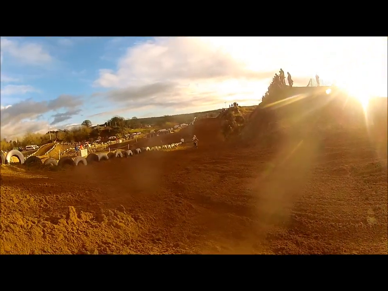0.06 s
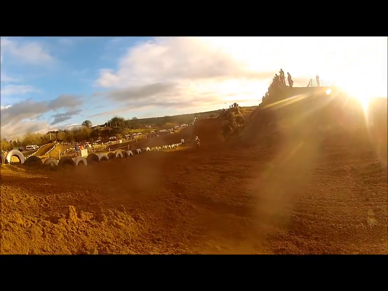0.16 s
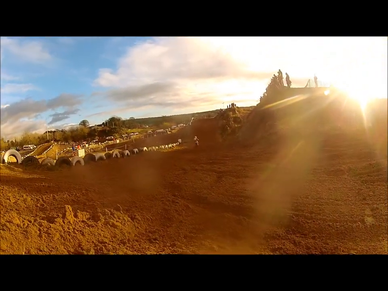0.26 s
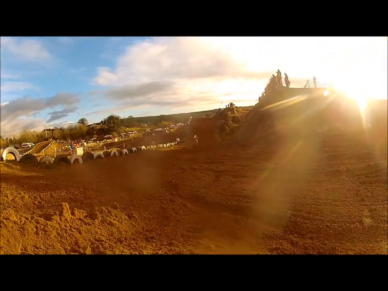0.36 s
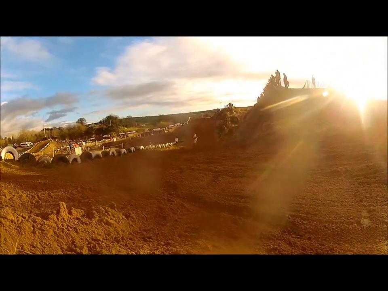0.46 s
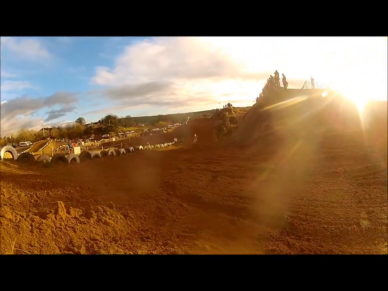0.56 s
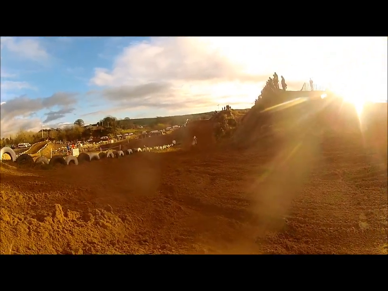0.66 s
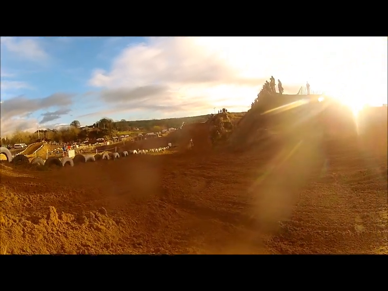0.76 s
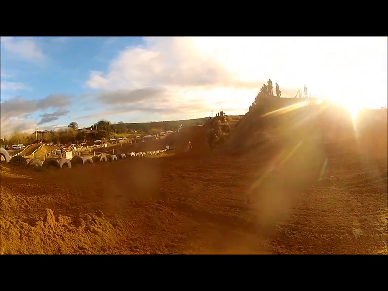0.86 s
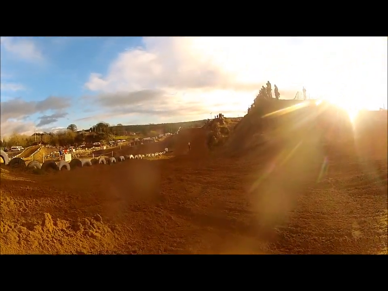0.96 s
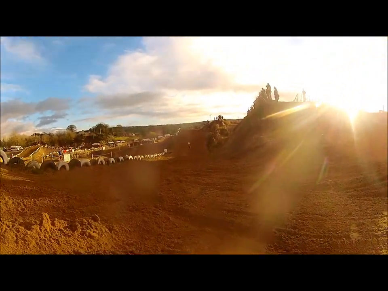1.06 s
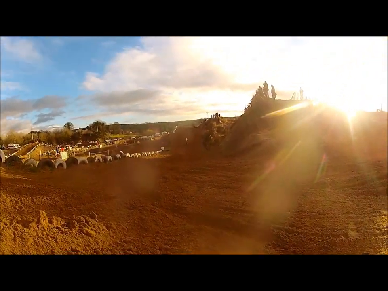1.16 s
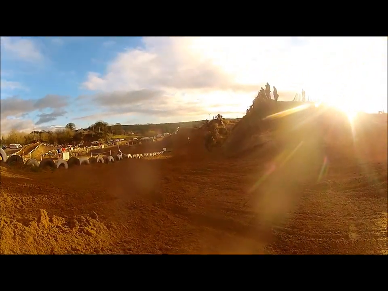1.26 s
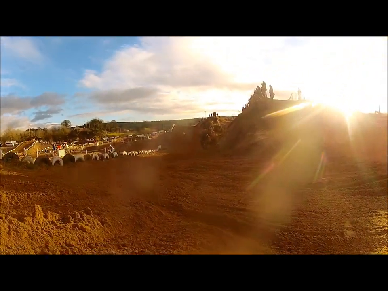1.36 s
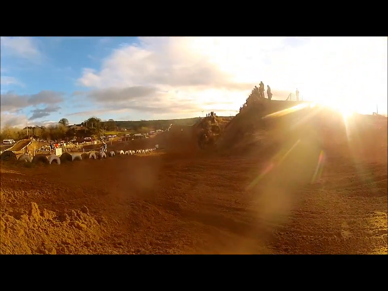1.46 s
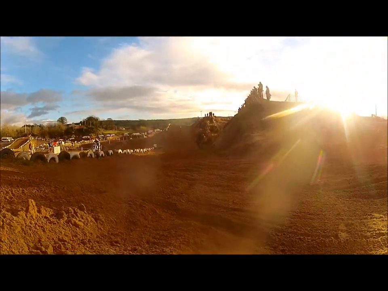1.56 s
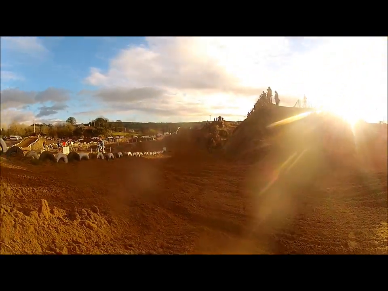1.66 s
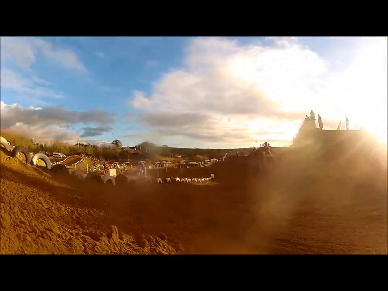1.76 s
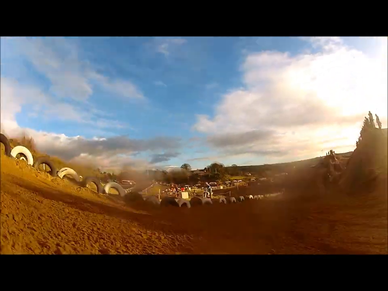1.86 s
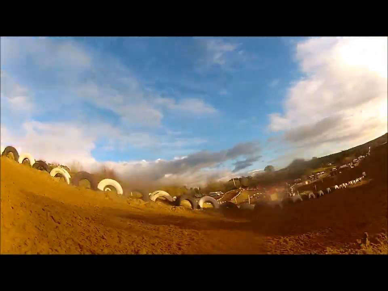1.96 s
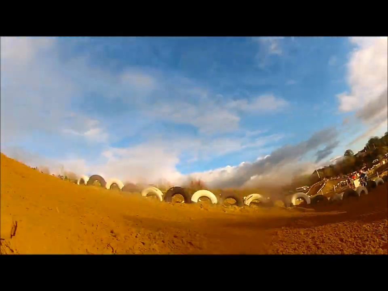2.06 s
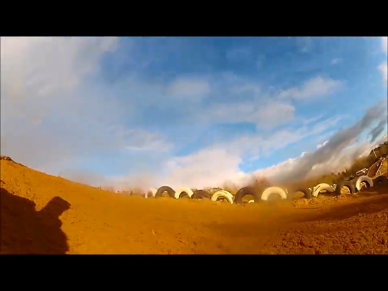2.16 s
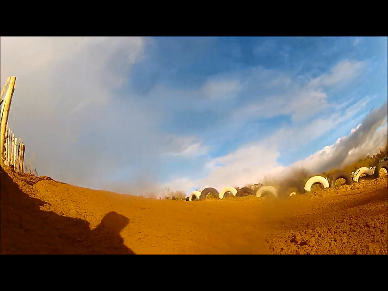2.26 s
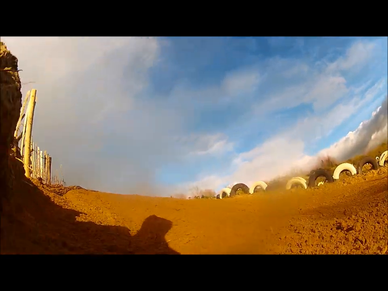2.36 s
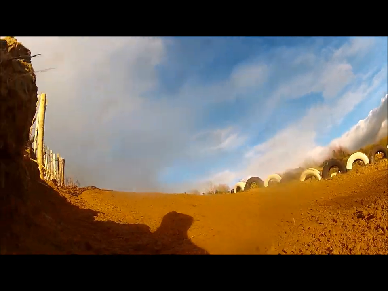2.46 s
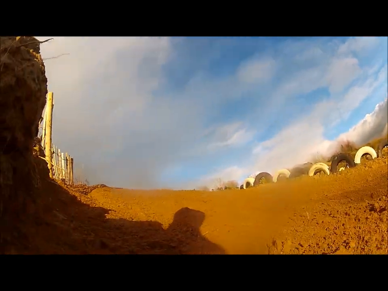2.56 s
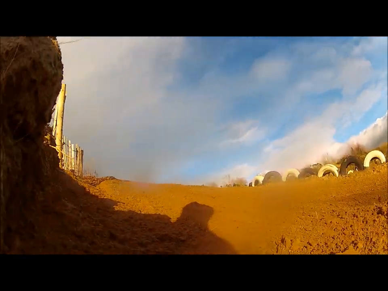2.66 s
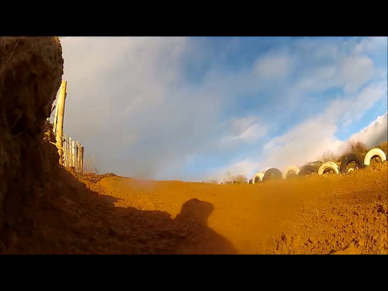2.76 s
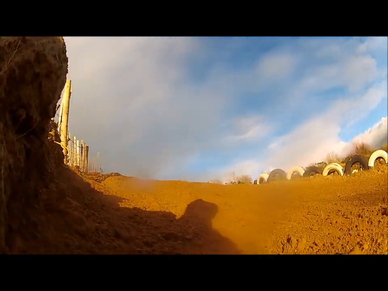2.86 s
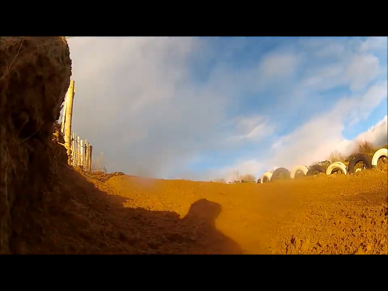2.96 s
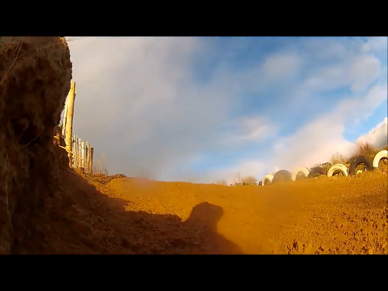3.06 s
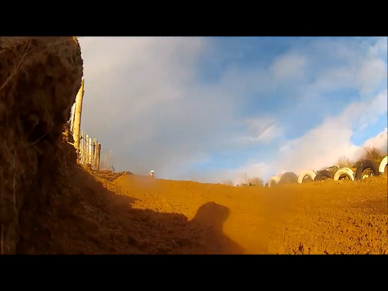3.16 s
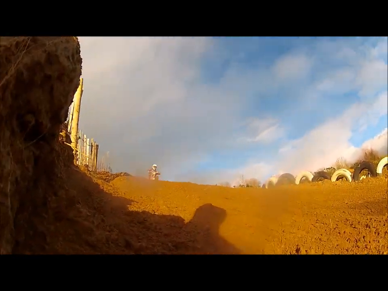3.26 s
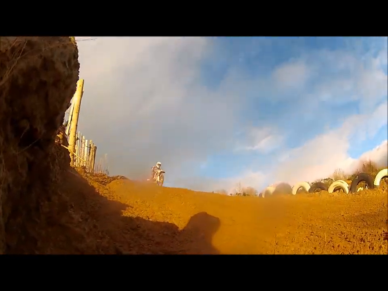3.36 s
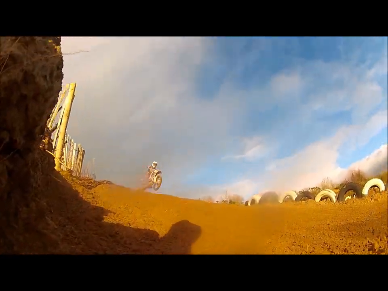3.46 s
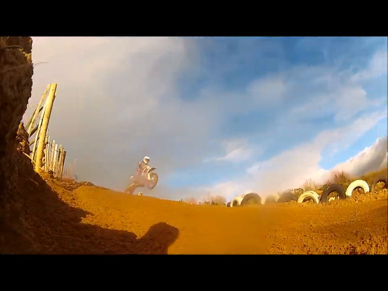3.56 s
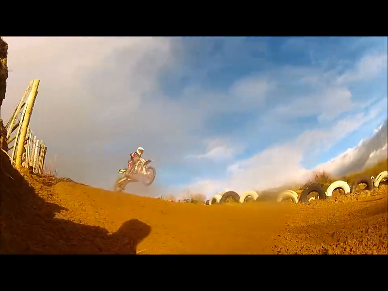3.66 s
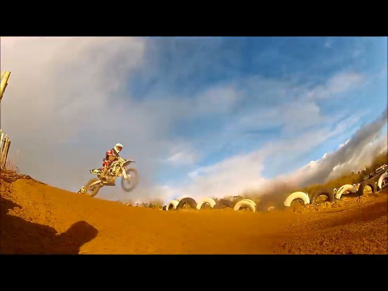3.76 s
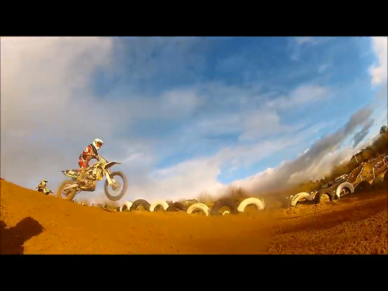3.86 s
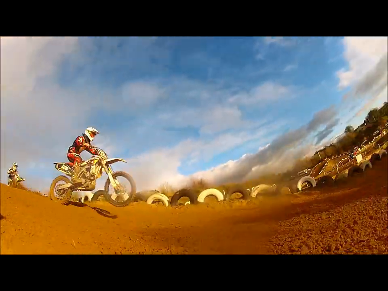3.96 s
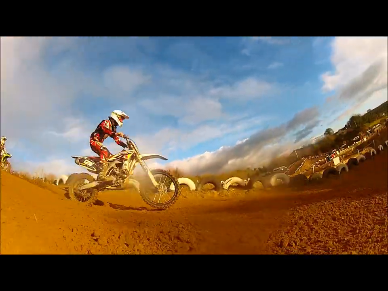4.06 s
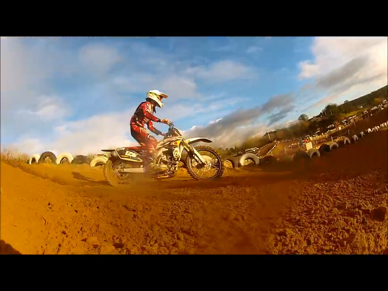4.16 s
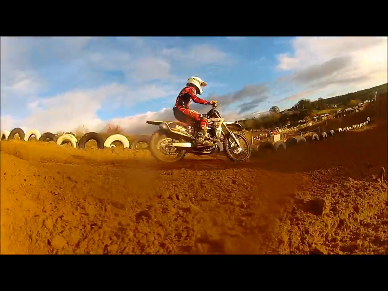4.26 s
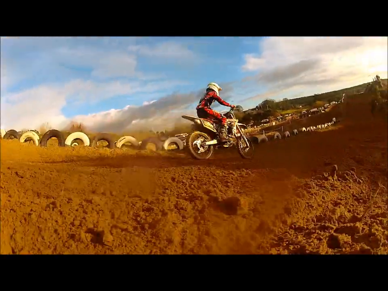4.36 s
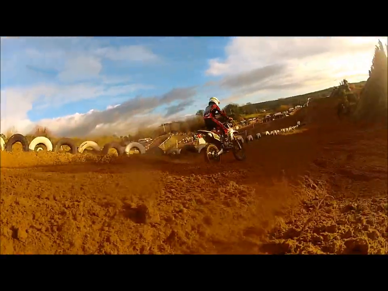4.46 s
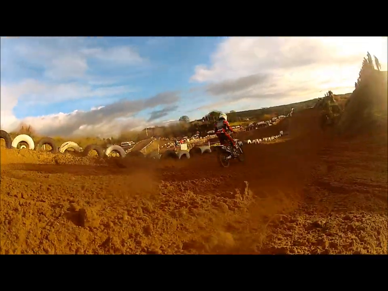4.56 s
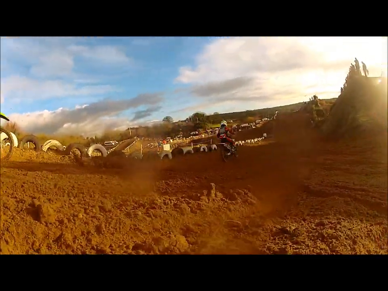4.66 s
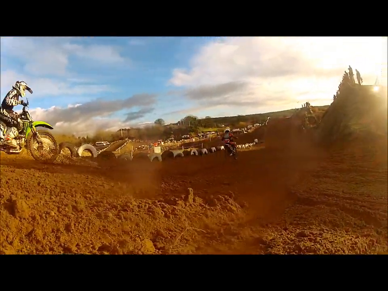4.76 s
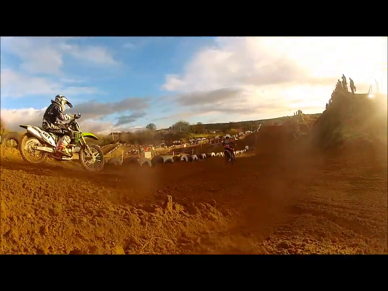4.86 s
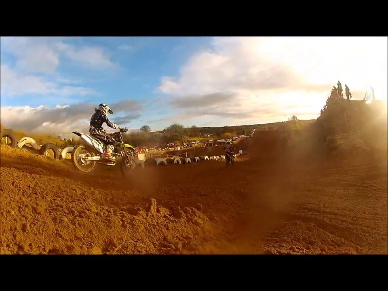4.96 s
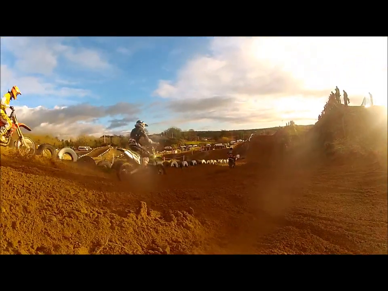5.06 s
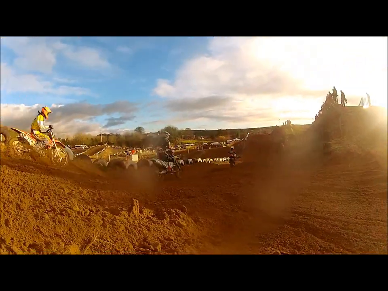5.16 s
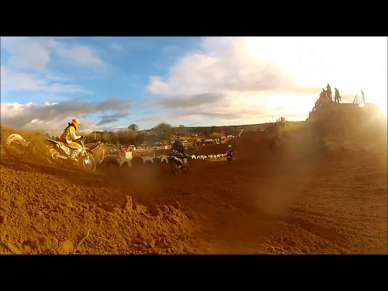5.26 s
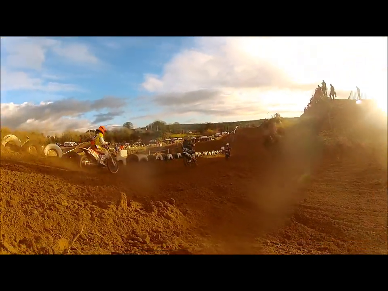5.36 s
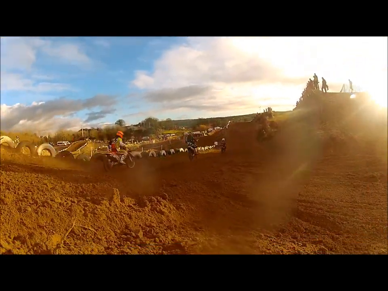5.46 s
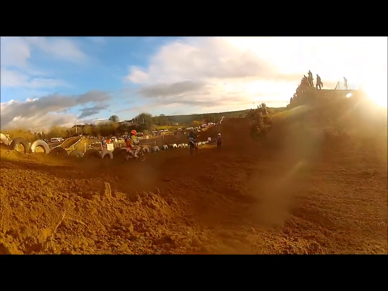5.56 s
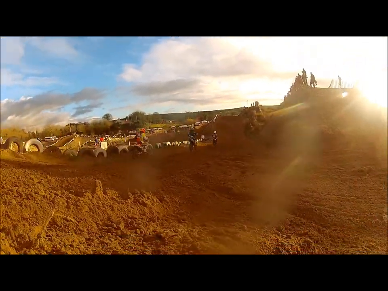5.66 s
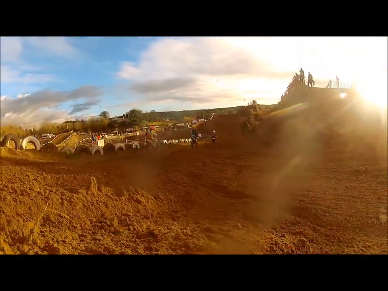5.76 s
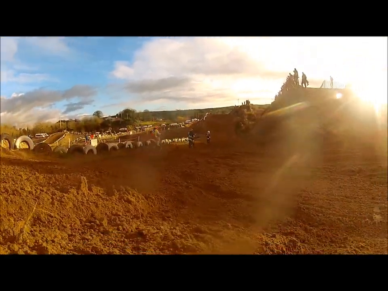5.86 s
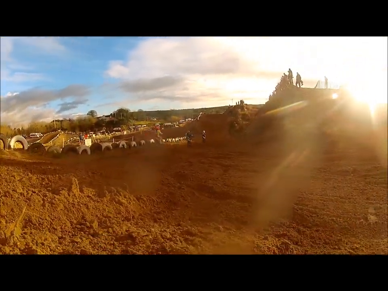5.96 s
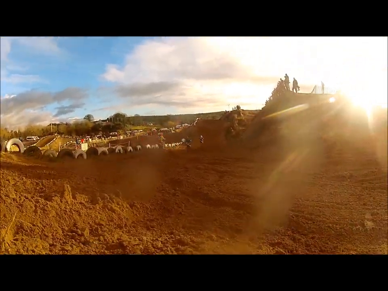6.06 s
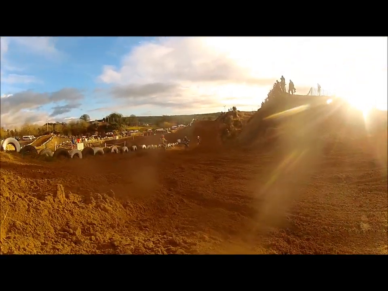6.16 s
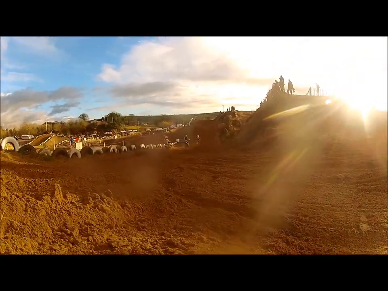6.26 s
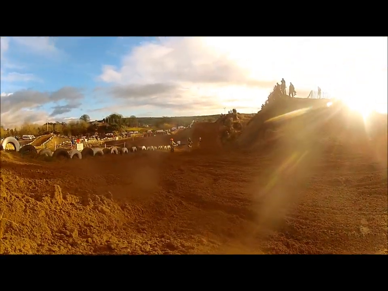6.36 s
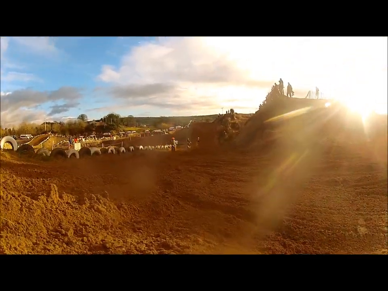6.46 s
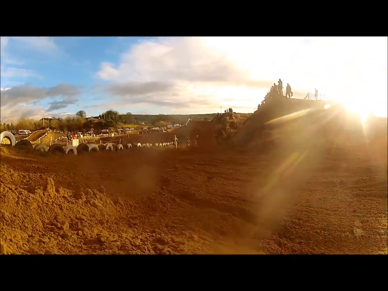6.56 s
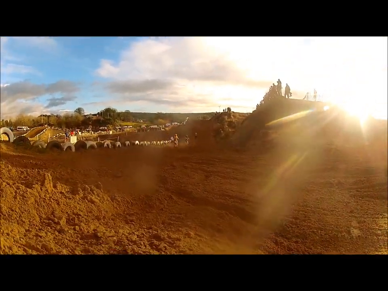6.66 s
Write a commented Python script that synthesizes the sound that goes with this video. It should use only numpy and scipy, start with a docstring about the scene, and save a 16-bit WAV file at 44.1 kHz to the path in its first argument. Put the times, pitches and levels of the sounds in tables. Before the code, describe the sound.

Three motocross bikes rasp past close by on a dirt track, revving and scattering soil, after a stretch of distant engine drone.

```python
"""Beside a dirt track: single-cylinder four-stroke motocross bikes race past a microphone in a plastic
housing. One bike leaves, the pack drones far off, then three jump in, work the throttle and pull away.
Each firing gives a low thump, a bark in the pipe and a sharp burst of gas that rings the housing.
Thrown soil patters, earth banks echo, and knocks and gusts of air hit the housing."""
import sys
import numpy as np
from scipy import signal
from scipy.io import wavfile
from scipy.ndimage import map_coordinates

SR = 44100
rng = np.random.default_rng(int(sys.argv[2]) if len(sys.argv) > 2 else 0)


def waveform_to_disk(signal):
    """Save audio, clipped to [-1, 1], as 16-bit WAV at the path in sys.argv[1]."""
    frames = np.transpose(np.atleast_2d(signal))
    scaled = np.clip(frames, -1, 1) * 32767
    samples = np.round(scaled).astype(np.int16)
    wavfile.write(sys.argv[1], SR, samples)


N = 295470
TIME_S = np.arange(N) / SR
BINS_HZ = np.fft.rfftfreq(8192, 1 / SR)

# pass-by per bike: closest_s, distance_over_speed_s
PASSES = {"leaving": (-0.87, 0.57), "far": (1.78, 1.3), "behind jump": (3.0, 2.7), "lead": (4.23, 0.33),
          "second": (4.894, 0.52), "third": (5.2, 0.46)}
# spectrum of a distant exhaust: freq_hz, gain_db
DRONE = [(25, -26), (70, -12.5), (140, 2), (210, -1), (290, -5.5), (400, -19.5), (600, -32.5), (900, -33),
         (2500, -96)]
# air path from behind the jump: freq_hz, gain_db
JUMP_AIR = [(500, 10), (1300, -2), (2400, 1), (3000, 6), (3700, -3), (4300, -0.5), (6000, -1), (9000, -1.5),
            (12000, 6), (15000, 2)]


def bike(name, revs, air, thump_spectrum, uneven_db, shock_gain):
    """Each firing thumps, barks in the pipe and cracks; combustion varies from cycle to cycle."""
    # unusually hard firings: time_s, extra_crack_db, bike
    hard_firings = [(.026, 6, "leaving"), (0.361, 2.5, "leaving"), (.396, 4, "leaving"),
                    (.532, 7.5, "leaving"), (3.205, 11.5, "behind jump"), (4.325, 6, "lead"),
                    (4.44, 3, "lead"), (4.517, 6.5, "lead"), (5.049, 7, "second"), (5.324, 8.5, "third"),
                    (5.419, 8, "third"), (5.431, 4.5, "third"), (5.479, 6, "third"), (5.583, 6.5, "third"),
                    (5.61, 6, "third"), (5.68, 4, "third"), (5.833, 0.5, "third"), (5.952, 3.5, "third"),
                    (6.116, 3, "third"), (6.51, 3, "third")]
    # spectra of pipe, pressure front and silencer: freq_hz, gain_db
    pipe_spectrum = [(150, -25.5), (280, -7.5), (330, 12), (400, 3.5), (460, 1), (570, -7), (780, -21.5),
                     (1100, -31), (2500, -30.5)]
    front_spectrum = [(250, -45), (430, -28), (590, -6.5), (800, -22.5), (1000, -5.5), (1200, -15),
                      (1550, -10), (1950, -6.5), (2350, 6.5), (2900, -22), (3600, 14.5), (4200, -22.5),
                      (8000, -34.5)]
    silencer_spectrum = [(500, -3.5), (2400, 8), (3500, -17), (7000, -11.5)]
    jitter_s, front_delay_s, fade_s = 0.00006, 0.000617, 0.06

    firing_hz, = curves(revs)
    at = firing_samples(firing_hz)
    size = 1 / np.sqrt(firing_hz[at.astype(int)])
    burn, swirl, jet, late = rng.standard_normal((1024, 4))[:len(at)].T
    at = at + jitter_s * SR * late
    blast_at = at.copy()
    blast_db = uneven_db * np.clip(0.6 * burn + 0.8 * jet, -2, 1.4)
    for time_s, extra_db, who in hard_firings:
        if who == name:
            nearest = np.argmin(abs(at / SR - time_s))
            blast_at[nearest], blast_db[nearest] = time_s * SR, extra_db
    blast = size * amp(blast_db)

    thump = colour(pulses(at, size * amp(-0.76 * burn)), shape(thump_spectrum))
    bark = colour(pulses(at, size * amp(2.5 * swirl)), shape(pipe_spectrum))
    # a steep pressure front on each burst gives the rasp its pitch
    front = pulses(at + front_delay_s * SR, np.sqrt(size * blast))
    front = colour(front, shape(front_spectrum) * shape(air))
    path = housing() * shape(air)
    burst = colour(gas_bursts(blast_at, blast, linger_db=-17.5), path)
    ring = colour(gas_bursts(at, size, linger_db=16, linger_s=0.0016), path * shape(silencer_spectrum))
    crack = shock_gain * unit_rms(front) + unit_rms(burst) + amp(-6) * unit_rms(ring)
    _, aspect = pass_by(name)
    crack = rider_shadow(unit_rms(crack), aspect)

    thump_gain, bark_gain, crack_gain = exhaust_gains(name, firing_hz)
    running = gate(revs[0][0], revs[-1][0], fade_s, fade_s)
    return running * (thump_gain * unit_rms(thump) + bark_gain * unit_rms(bark) + crack_gain * crack)


def firing_samples(firing_hz):
    """Fractional sample positions at which the engine completes a cycle."""
    cycles = np.cumsum(firing_hz) / SR
    return np.interp(np.arange(int(cycles[-1]) + 1), cycles, np.arange(N))


def gas_bursts(at, size, linger_db=-17, linger_s=0.0045, rise_s=0.0004, fall_s=0.0006):
    """Turbulent bursts: the exhaust valve opens, gas jets out and dies away."""
    t = TIME_S[:SR // 30]
    decay = np.exp(-t / fall_s) + amp(linger_db) ** 2 * np.exp(-t / linger_s)
    burst_power = (1 - np.exp(-t / rise_s)) ** 2 * decay
    power = signal.oaconvolve(pulses(at, size ** 2), burst_power)[:N]
    return np.sqrt(abs(power)) * rng.standard_normal(N)


def exhaust_gains(name, firing_hz, opening_s=0.028, closing_s=0.061, mid_revs_hz=70):
    """Gains of thump, bark and crack from throttle, revs, distance and the way the silencer points."""
    # throttle twists, levels at closest point and mid revs:
    # open_s, shut_s, thump_db, bark_db, crack_db, bike
    throttle = [(0.0, 0.286, -26, -55, -34, "leaving"), (0.35, 0.69, -29.5, -67, -33, "leaving"),
                (0.681, 0.79, -28, -46, -37, "leaving"), (0.926, 1.06, -32.5, -46, -37.5, "leaving"),
                (1.187, 1.66, -35, -74, -51, "far"), (1.686, 1.935, -36.5, -59, -43.5, "far"),
                (2.073, 2.235, -37, -69, -53, "far"), (2.306, 2.45, -46.5, -50.5, -45.5, "behind jump"),
                (2.556, 2.62, -36, -48.5, -34, "behind jump"),
                (3.12, 3.216, -39, -47, -41.5, "behind jump"), (3.404, 3.556, -43, -47, -46, "behind jump"),
                (3.564, 3.737, -31, -30, -30.5, "lead"), (3.91, 4.173, -24, -33, -24, "lead"),
                (4.208, 4.702, -23, -27, -23.5, "lead"), (4.826, 5.041, -21, -18.5, -23, "lead"),
                (4.515, 4.759, -26, -26, -18, "second"), (4.821, 5.3, -25.5, -33, -24, "second"),
                (5.55, 6.07, -24.5, -31.5, -30, "second"), (6.304, 6.422, -23, -42, -40, "second"),
                (4.818, 4.98, -21.5, -26.5, -36, "third"), (5.188, 5.357, -25.5, -25, -21.5, "third"),
                (5.368, 5.687, -27, -29.5, -23.5, "third"), (5.73, 5.963, -23, -32.5, -24, "third"),
                (5.987, 6.298, -21, -37, -22.5, "third"), (6.324, 6.542, -24, -45, -24.5, "third"),
                (6.566, 6.7, -23.5, -35, -28, "third")]
    # response of each part: shut_db, revs_db_per_octave, behind_db, distance_exponent
    thump_law = (-9, 8.5, 3.5, 1.0)
    bark_law = (-3.5, 2.5, 1, 1.8)
    crack_law = (-13, 5, 6, 1.0)

    twists = np.array([row[:-1] for row in throttle if row[-1] == name])
    spans_s, levels_db = twists[:, :2], twists[:, 2:]
    opened = np.max([gate(on_s, off_s, opening_s, closing_s) for on_s, off_s in spans_s], axis=0)
    octaves = np.log2(firing_hz / mid_revs_hz)
    distance, aspect = pass_by(name)
    gains = []
    for twist_db, law in zip(levels_db.T, (thump_law, bark_law, crack_law)):
        shut_db, octave_db, behind_db, exponent = law
        level_db = np.interp(TIME_S, spans_s.ravel(), np.repeat(twist_db, 2))
        level_db += shut_db * (1 - opened) + octave_db * octaves + behind_db * aspect
        gains.append(amp(level_db) / distance ** exponent)
    return gains


def pass_by(name):
    """Distance as a multiple of the closest one; aspect from -1 (coming) to 1 (going)."""
    closest_s, passing_s = PASSES[name]
    along = (TIME_S - closest_s) / passing_s
    distance = np.hypot(1, along)
    return distance, along / distance


def rider_shadow(x, aspect, cutoff_hz=2560, head_on_db=-17.5):
    """Bike and rider hide the exhaust's treble while they approach."""
    dull = signal.sosfiltfilt(signal.butter(4, cutoff_hz, fs=SR, output="sos"), x)
    return dull + (x - dull) * amp(head_on_db * np.minimum(aspect, 0) ** 2)


def housing():
    """Gain per bin: the plastic box around the microphone, plus faint high-treble peaks."""
    # box resonances, plus faint narrow peaks in the high treble: freq_hz, width_hz, gain_db
    peaks = [(1034, 256, -17), (1369, 280, -10), (1594, 240, -7), (1864, 180, -9), (2365, 510, -4.5),
             (3440, 510, -5.5), (3722, 360, 1.5), (4550, 630, -9.5), (5180, 890, -15), (6630, 530, -17.5),
             (7340, 770, -13.5), (8344, 557, -5.5), (9620, 420, -12.5), (10350, 510, -22),
             (11750, 135, -23.5), (12293, 100, -28), (14100, 400, -23), (13880, 530, -18),
             (15700, 400, -16.5)]
    power = sum(amp(db) ** 2 / (1 + (2 * (BINS_HZ - hz) / width_hz) ** 2) ** 2
                for hz, width_hz, db in peaks)
    return np.sqrt(power)


def drone_and_rasp(engines=4, firing_hz=62, swing=0.2, blips_per_s=4, waver_db=3, wavers_per_s=7):
    """Far engines rev up and down; a smeared rasp swells as the close bikes pass."""
    # far engines droning, then the smeared rasp of the three close bikes: time_s, drone_db, rasp_db
    levels = [(0, -39, -42), (1.2, -46.5, -53.5), (2.0, -42.5, -50.5), (2.65, -37.5, -45.5),
              (3.05, -41.5, -49), (3.4, -37.5, -51.5), (3.8, -32.5, -43.5), (4.4, -27.5, -35),
              (4.95, -20.5, -19.5), (5.6, -27.5, -52), (6.7, -33, -37.5)]
    revs_hz = [firing_hz * np.exp(swing * wander(blips_per_s)) for _ in range(engines)]
    at = np.concatenate([firing_samples(hz) for hz in revs_hz])
    size = amp(0.8 * rng.standard_normal(len(at)))
    drone = colour(pulses(at, size), shape(DRONE))
    smeared = unit_rms(gas_bursts(at, size)) + rng.standard_normal(N)
    rasp = colour(smeared, housing() * shape(JUMP_AIR))
    drone_db, rasp_db = curves(levels)
    rasp_db += waver_db * wander(wavers_per_s)
    return amp(drone_db) * unit_rms(drone) + amp(rasp_db) * unit_rms(rasp)


def soil_spray(level_db=-31, grains_per_s=2500, spread_db=3.5, lead_s=0.21, rise_s=0.087, fall_s=1):
    """Crumbs of earth patter down behind the wheels of the three passing bikes."""
    # spectrum of falling soil: freq_hz, gain_db
    soil_spectrum = [(500, -3), (1500, 10), (3600, 1), (6000, 3), (9000, 3), (15000, 9.5)]
    grains = (rng.random(N) < grains_per_s / SR) * rng.standard_normal(N)
    grains *= amp(spread_db * np.minimum(rng.exponential(1, N), 4))
    patter = unit_rms(colour(grains, housing() * shape(soil_spectrum)))
    since_s = np.array([TIME_S - PASSES[name][0] + lead_s for name in ("lead", "second", "third")])
    sprays = np.exp(np.minimum(since_s / rise_s, -since_s / fall_s))
    return amp(level_db) * np.linalg.norm(sprays, axis=0) * patter


def handling(knock_peak_db=-32, rumble_db=-50.5, gust_db=2, gusts_per_s=7.7):
    """Small knocks and gusts of air on the housing as it is swung round."""
    # knocks on the box: time_s, relative_db
    hits = [(1.924, -29), (3.3194, -34), (3.3967, -50)]
    # spectrum of buffeting air: freq_hz, gain_db
    buffet_spectrum = [(20, -3), (45, 10), (80, 18), (200, -22), (1000, -80)]
    hit_s, hit_db = np.transpose(hits)
    knocks = colour(gas_bursts(hit_s * SR, amp(hit_db)), housing())
    buffet = unit_rms(colour(rng.standard_normal(N), shape(buffet_spectrum)))
    buffet *= amp(rumble_db + gust_db * wander(gusts_per_s))
    return amp(knock_peak_db) * knocks / abs(knocks).max() + buffet


def ground_bounce(x, bounce_gain=0.13):
    """Sound skimming off the ground arrives late and combs the direct sound."""
    # reflection lag as the microphone swings: time_s, delay_s
    lags = [(0, 0.002), (1.9, 0.0005), (2.3, 0.00042), (2.8, 0.00024), (3.2, 0.000736), (3.6, 0.00088),
            (4.2, 0.0011)]
    delay_s, = curves(lags)
    reflected = np.interp(TIME_S - delay_s, TIME_S, x)
    return (x + bounce_gain * reflected) / np.sqrt(1 + bounce_gain ** 2)


def bank_echoes(x, t60_s, density=0.05, predelay_s=0.004):
    """Scattered echoes from earth banks and tyre walls."""
    t = TIME_S[:SR // 2]
    taps = rng.standard_normal(len(t)) * (rng.random(len(t)) < density)
    taps *= amp(-60 * t / t60_s) * (t > predelay_s)
    return signal.oaconvolve(x, taps / np.linalg.norm(taps))[:N]


def amp(db):
    """Decibels to gain."""
    return 10 ** (np.asarray(db) / 20)


def unit_rms(x):
    """Scales to an rms of one."""
    return x / np.sqrt(np.mean(x ** 2) + 1e-20)


def gate(on_s, off_s, rise_s, fall_s):
    """One from on_s to off_s, with linear ramps outside."""
    return np.clip(np.minimum((TIME_S - on_s) / rise_s, (off_s - TIME_S) / fall_s) + 1, 0, 1)


def curves(rows):
    """Columns of a timed table at every sample."""
    time_s, *columns = np.transpose(rows)
    return [np.interp(TIME_S, time_s, column) for column in columns]


def shape(points):
    """Gain per bin from a short spectrum."""
    hz, db = np.transpose(points)
    return amp(np.interp(np.log(BINS_HZ + 1), np.log(hz), db))


def colour(x, gain):
    """Minimum-phase filter: rings after a pulse, never before."""
    log_gain = np.log(np.maximum(gain, 1e-5))
    mirrored = np.r_[log_gain, log_gain[-2:0:-1]]
    response = np.exp(np.conj(signal.hilbert(mirrored)))
    taps = np.fft.ifft(response).real[:len(BINS_HZ)]
    return signal.oaconvolve(np.float32(x), np.float32(taps))[:N]


def wander(per_s):
    """Smooth random curve of about unit size."""
    knots = rng.standard_normal(4096)
    t = TIME_S[::64]
    return np.interp(TIME_S, t, map_coordinates(knots, [t * per_s], order=2, mode="wrap"))


def pulses(at, size):
    """One click per position, shared between neighbouring samples."""
    whole = np.clip(at.astype(int), 0, N - 2)
    fraction = at % 1
    return np.bincount(whole, size * (1 - fraction), N) + np.bincount(whole + 1, size * fraction, N)


def scene():
    """All bikes on the open track, the same in both channels."""
    # engine speed per bike: time_s, firing_hz
    leaving_revs = [(0.0, 63.12), (0.252, 77.2), (0.336, 60.02), (0.508, 58.98), (0.61, 65.3),
                    (0.784, 78.25), (0.806, 77), (0.892, 62.72), (1.15, 52.97)]
    lead_revs = [(3.501, 56.25), (3.701, 71.4), (3.862, 44.72), (4.081, 74.28), (4.138, 76.52),
                 (4.22, 68.04), (4.32, 68.55), (4.48, 92.76), (4.7, 77.48), (5.101, 80.1)]
    second_revs = [(4.4, 49.18), (4.56, 69.05), (4.67, 75.8), (4.841, 52.96), (4.939, 53.05),
                   (5.141, 84.34), (5.269, 62.02), (5.42, 60.69), (5.58, 74.57), (5.7, 72.85), (5.92, 87),
                   (6.0, 70.96), (6.231, 63.78), (6.371, 92.1), (6.65, 62.83)]
    third_revs = [(4.781, 54), (4.92, 66.03), (5.0, 60.06), (5.12, 79.74), (5.21, 82.95), (5.33, 68.41),
                  (5.44, 85.44), (5.56, 73.09), (5.67, 73.4), (5.731, 79.1), (5.82, 78.38), (5.93, 97.9),
                  (5.99, 85.68), (6.1, 98.83), (6.26, 99.57), (6.36, 86.8), (6.51, 79.7), (6.7, 101.7)]
    far_revs = [(1.1, 49), (1.5, 49.86), (1.77, 42.6), (1.918, 54.97), (2.25, 49)]
    jump_revs = [(2.328, 69.07), (2.44, 76.34), (2.65, 47.06), (2.969, 53.1), (3.12, 45.2), (3.22, 55.13),
                 (3.299, 44.15), (3.549, 46.9)]
    # air paths by direction: freq_hz, gain_db
    rear_air = [(500, 14.5), (1000, 7), (1500, -1.5), (2400, 0.5), (3000, -0.5), (3700, 2), (6000, -6),
                (8500, 1), (15000, 0.5)]
    close_air = [(500, -2.2), (1500, -1.3), (2400, -1.1), (2900, 5.5), (3600, 0.2), (6000, 0.7),
                 (9000, 0.6), (15000, -1.5)]
    side_air = [(500, 4.5), (750, 4.5), (1000, 2.5), (1500, -2), (2300, 2), (2900, -1), (3600, 1.5),
                (6000, 1.5), (9000, 2), (15000, 1)]
    far_air = [(500, 17.5), (1000, 17.5), (1500, 10.5), (2400, 6.5), (3000, -15), (3700, -8), (6000, -8),
               (9000, -0.5), (15000, 11)]
    # exhaust thump spectra by direction: freq_hz, gain_db
    rear_thump = [(25, -50), (60, -10), (120, 14.5), (160, -0.5), (215, 7.5), (255, 4.5), (305, -6),
                  (340, -50), (460, -28), (600, -19.5), (1500, -66)]
    close_thump = [(25, -60), (55, -30), (85, -3), (125, 7), (165, 3.5), (215, -1), (275, 5), (330, -3),
                   (385, -33.5), (700, -42), (1500, -42.5)]
    side_thump = [(25, -56), (55, -5), (85, -0.5), (125, -3.5), (165, 9), (210, -4), (275, 7.5), (315, 1),
                  (365, -29.5), (700, -55), (1500, -82)]
    far_thump = [(25, -24), (50, -21), (100, -7), (140, 8), (200, -25), (290, -25), (370, -30), (600, -35),
                 (1500, -61)]

    near = bike("leaving", leaving_revs, rear_air, rear_thump, uneven_db=0.3, shock_gain=0.21)
    near += bike("lead", lead_revs, close_air, close_thump, uneven_db=2, shock_gain=0.5)
    near += bike("second", second_revs, close_air, close_thump, uneven_db=-1, shock_gain=0.39)
    near += bike("third", third_revs, side_air, side_thump, uneven_db=4, shock_gain=0.5)
    far = bike("far", far_revs, far_air, far_thump, uneven_db=-0.5, shock_gain=0.25)
    far += bike("behind jump", jump_revs, JUMP_AIR, DRONE, uneven_db=8, shock_gain=0.22)
    echoes = amp(-23) * bank_echoes(near, t60_s=0.25) + amp(-11) * bank_echoes(far, t60_s=0.45)
    combed = amp(-2) * ground_bounce(far + drone_and_rasp())
    return np.tile(near + combed + echoes + soil_spray() + handling(), (2, 1))


def record(dry):
    """Hard limit at full scale, then a low-pass."""
    cutoff_hz = 15700
    lowpass = signal.firwin(511, cutoff_hz, window=("kaiser", 9), fs=SR)
    return signal.oaconvolve(np.clip(dry, -1, 1), lowpass[None], "same")


dry = scene()
out = record(dry)
waveform_to_disk(out)
```